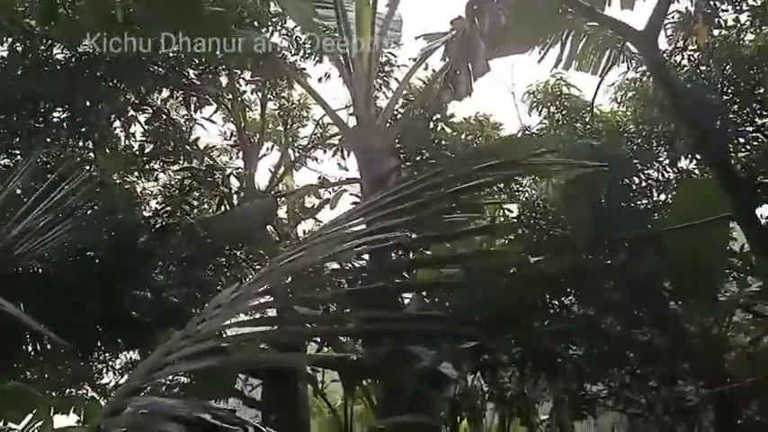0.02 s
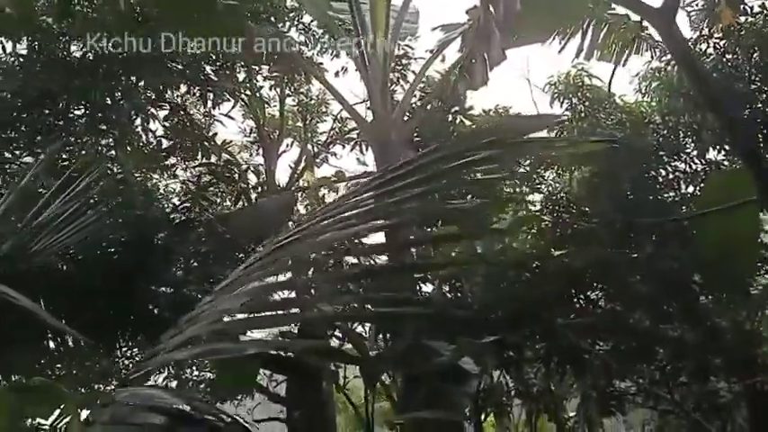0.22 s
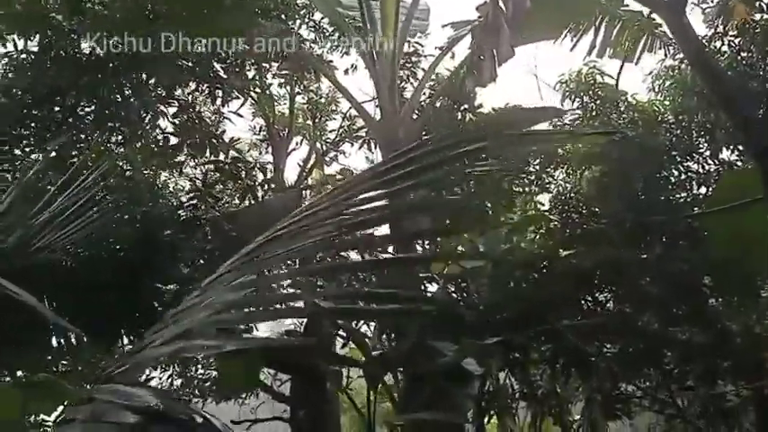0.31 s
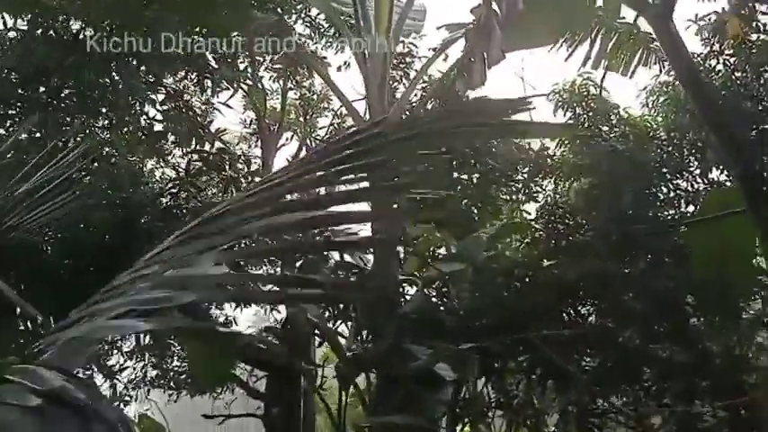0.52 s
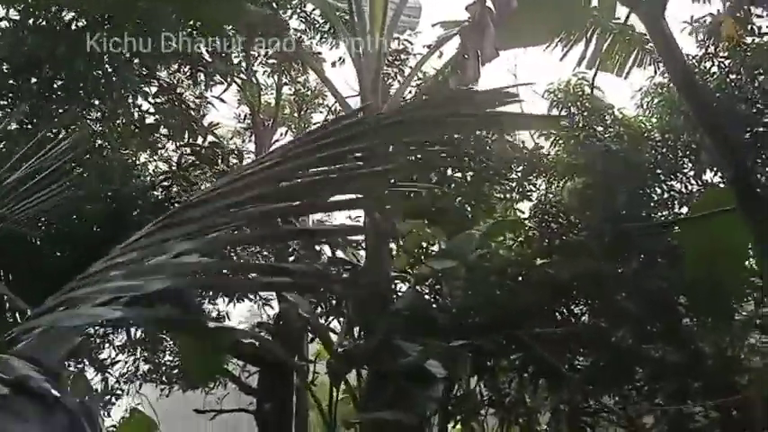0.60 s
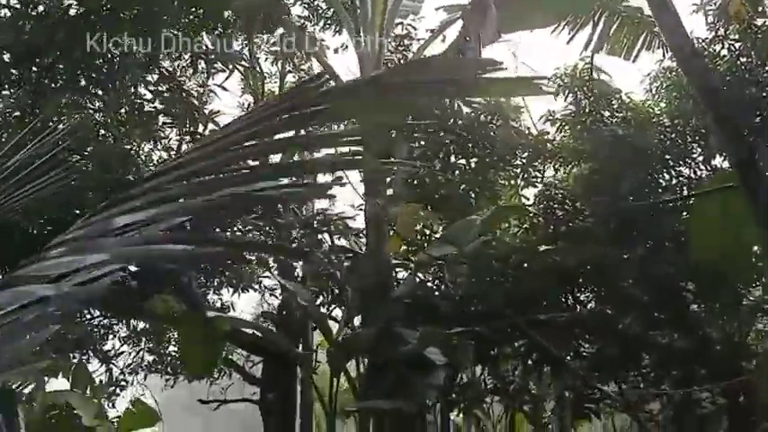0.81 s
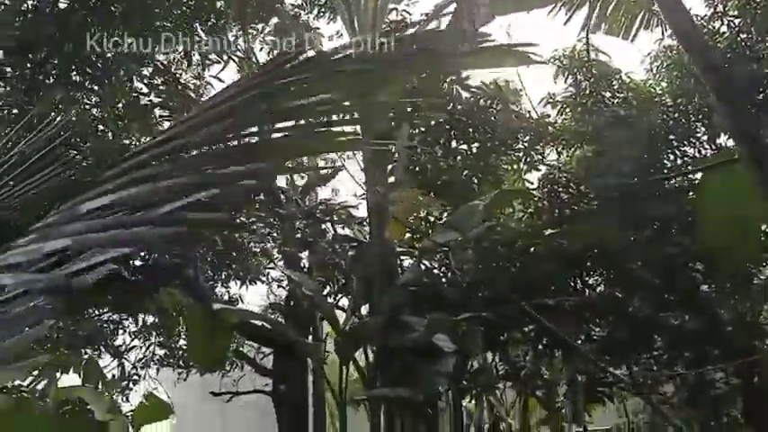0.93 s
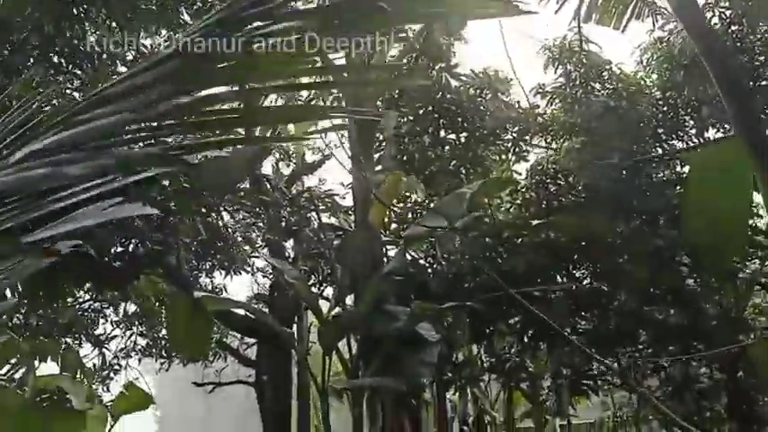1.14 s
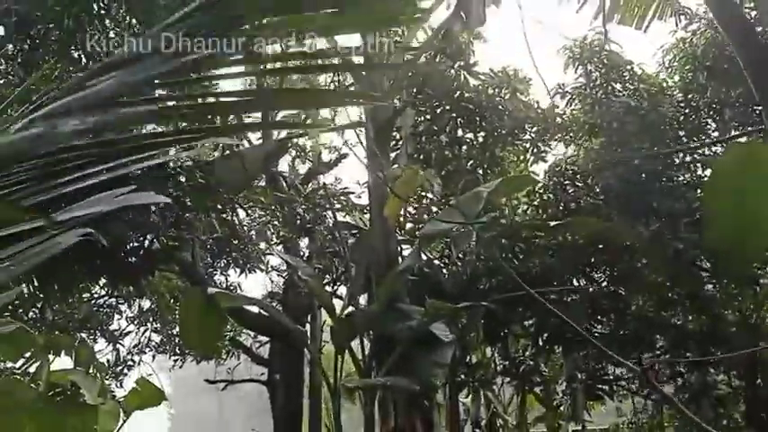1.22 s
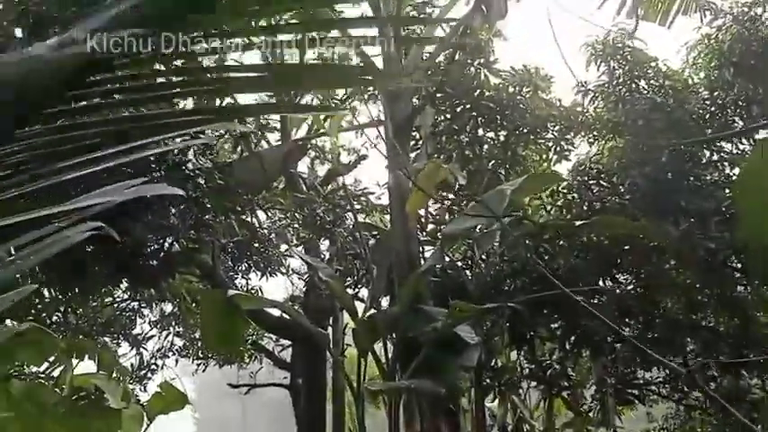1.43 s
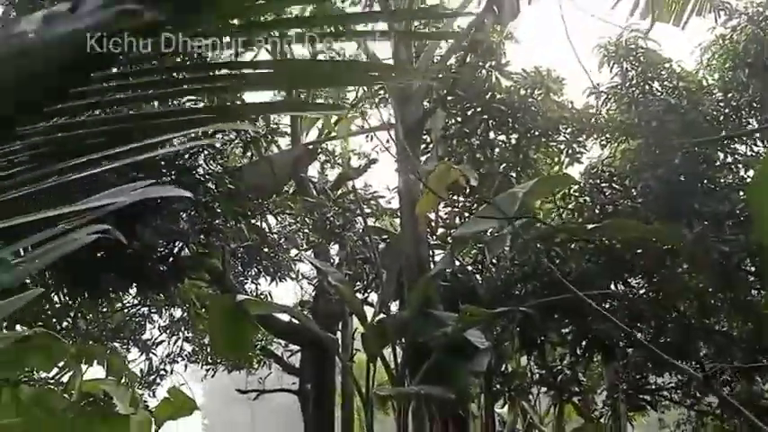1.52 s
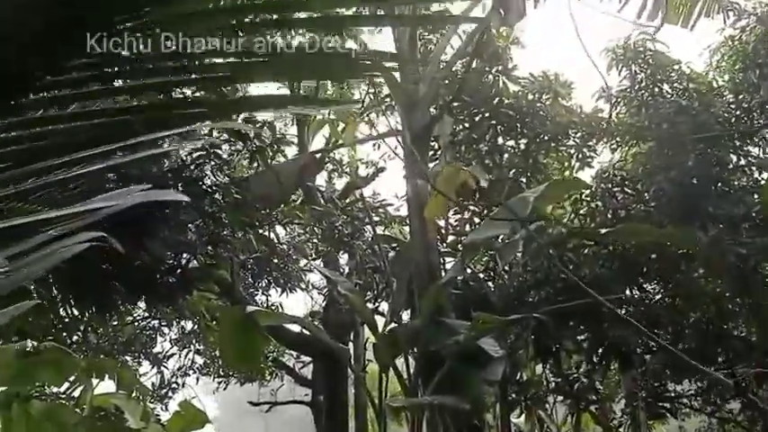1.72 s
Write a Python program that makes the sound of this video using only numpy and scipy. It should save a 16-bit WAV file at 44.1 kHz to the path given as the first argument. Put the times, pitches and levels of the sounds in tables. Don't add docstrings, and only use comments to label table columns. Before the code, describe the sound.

Birds call in garden trees. A near bird whistles bright, short rising notes at about 0.2, 0.75, 1.25 and 1.8 seconds, some with a soft swell before. Lower husky chirps and thin high whistles answer. A hoarse caw runs from 0.8 to 1.2, then leaves rustle until 1.6 and reedy notes fall. Drops tick; faint coos, distant chatter and low town hum lie beneath, with fluttering leafy echoes.

```python
import sys
import numpy as np
from scipy import signal
from scipy.io import wavfile
from scipy.ndimage import uniform_filter1d

SR = 44100
rng = np.random.default_rng(int(sys.argv[2]) if len(sys.argv) > 2 else 0)


def log_audio(samples):
    frames = np.atleast_2d(samples).T
    limited = np.clip(frames, -1, 1)
    pcm = np.round(limited * 32767).astype(np.int16)
    wavfile.write(sys.argv[1], SR, pcm)


def ratio_of_db(decibels):
    return 10 ** (np.asarray(decibels, float) / 20)


N = 79380

ATTACK_S, RELEASE_S = 0.0077, 0.032
SOFT_ATTACK_S = 0.014


def rms_one(x):
    return x / np.sqrt(np.mean(x ** 2) + 1e-20)


def at_hz(points, hz):
    table_hz, value = np.array(points).T
    return np.interp(np.log(hz), np.log(table_hz), value)


def drift(rate):
    r = np.exp(-80 * np.pi * rate / SR)
    white = rng.standard_normal(N // 40 + 2002)
    slow = signal.lfilter([1], [1, -2 * r, r * r], white)[2000:]
    return np.interp(np.arange(N) / 40, np.arange(len(slow)), rms_one(slow))


def resonance(x, hz, width_hz):
    r = np.exp(-np.pi * width_hz / SR)
    zeros = np.array([1, 0, -1]) * (1 - r * r) / 2
    return signal.lfilter(zeros, [1, -2 * r * np.cos(2 * np.pi * hz / SR), r * r], x)


def sides(pan_db):
    return ratio_of_db(np.array([[.5], [-.5]]) * pan_db)


def foliage(x, direct_db, leaves_db, lag=0):
    t60_s, build_s = 0.35, 0.0026
    t = np.arange(SR // 2) / SR
    swarm = rng.standard_normal((2, len(t))) * ratio_of_db(-60 * t / t60_s) * (1 - np.exp(-t / build_s))
    swarm *= ratio_of_db(leaves_db) / np.sqrt(np.sum(swarm ** 2, axis=1, keepdims=True))
    swarm[[0, 1], [0, lag]] += ratio_of_db(direct_db)
    return signal.fftconvolve(x * np.ones((2, 1)), swarm, axes=1)[:, :N]


def near_bird():
    # t/s, effort level/dB, beak opening as second over first partial/dB
    near_notes = [
        [(0.212, -42, -19.5), (0.254, -34, 5.5), (0.274, -36, -9.5), (0.29, -42, 22), (0.314, -36.5, -38),
         (0.338, -67, 11), (0.352, -64, 16), (0.368, -60, 19), (0.4, -73, 12.5)],
        [(0.728, -59, -2), (0.742, -41, -6), (0.77, -38, 9.5), (0.788, -43.5, -29), (0.81, -27, -13.5),
         (0.822, -42, 7.5), (0.858, -62.5, 13.5), (0.88, -52.5, 7)],
        [(1.25, -49, -12), (1.27, -31.5, -5.5), (1.308, -36.5, -1.5), (1.384, -60, 15.5), (1.41, -50.5, -12)],
        [(1.775, -39, -7), (1.783, -43.5, -25), (1.8, -46.5, -2)],
    ]
    upper_db = [-23, -27]
    partial_pan_db = [4, -8, 9, -1]
    from_hz, top_hz, rise_s, sag_hz_per_s = 3200, 3360, 0.01572, 231
    wobble = .003
    smooth_s = 0.01
    breath_db, breath_hz, breath_width_hz = -29, 5040, 9500
    t, out = np.arange(N) / SR, np.zeros((2, N))
    for note in near_notes:
        s, db, beak_db = np.transpose(note)
        age = np.maximum(t - s[0], 0)
        hz = top_hz - (top_hz - from_hz) * np.exp(-age / rise_s) - sag_hz_per_s * age
        phase = 2 * np.pi * np.cumsum(hz * (1 + wobble * drift(54.8))) / SR
        edge = np.clip(np.minimum(age / ATTACK_S, (s[-1] + RELEASE_S - t) / RELEASE_S), 0, 1)
        efforts = [np.interp(t, s, db), np.interp(t, s, db + beak_db)]
        first, second = uniform_filter1d(efforts, int(smooth_s * SR) + 1)
        middle = (first + second) / 2
        levels = [first, second] + [middle + up for up in upper_db]
        voice = 0
        for k, (level, pan) in enumerate(zip(levels, partial_pan_db)):
            voice = voice + sides(pan) * ratio_of_db(level) * np.sin((k + 1) * phase)
        breath = rms_one(resonance(rng.standard_normal(N), breath_hz, breath_width_hz))
        voice = voice + ratio_of_db(middle + breath_db) * breath
        out += foliage(np.sqrt(2) * edge * voice, direct_db=-1, leaves_db=-5, lag=18)
    return out


def flock(notes, upper_db, pan_db, rasp=.004, shut_db=0, attack_s=ATTACK_S):
    glide_share, rising = .4, 1.04
    t, out = np.arange(N) / SR, np.zeros((2, N))
    for s, length, first_hz, last_hz, db in notes:
        age = np.maximum(t - s, 0)
        hz = last_hz + (first_hz - last_hz) * np.exp(-age / (glide_share * length))
        phase = 2 * np.pi * np.cumsum(hz * (1 + rasp * drift(90))) / SR
        edge = np.clip(np.minimum(age / attack_s, (s + length - t) / RELEASE_S), 0, 1)
        beak_db = shut_db * (last_hz < rising * first_hz)
        voice = np.sin(phase)
        for k, up in enumerate(upper_db):
            voice = voice + ratio_of_db(up + beak_db) * np.sin((k + 2) * phase)
        out += foliage(np.sqrt(2) * ratio_of_db(db) * edge * voice, direct_db=-4, leaves_db=4)
    return out * sides(pan_db)


def run_up():
    # t/s, length/s, first f/Hz, last f/Hz, level/dB
    swells = [
        (.14, 0.12, 3064, 3225, -49),
        (1.18, 0.15, 3133, 3187, -52.5),
        (1.69, 0.128, 3170, 3286, -49),
    ]
    return flock(swells, upper_db=[-1.5, -25], pan_db=2.0, attack_s=0.11)


def kin():
    # t/s, length/s, first f/Hz, last f/Hz, level/dB
    kin_notes = [
        (1.425, 0.036, 3144, 3300, -47),
        (1.47, 0.031, 3240, 3190, -50.5),
        (1.54, 0.101, 3195, 3170, -76),
    ]
    return flock(kin_notes, upper_db=[0.0, -25], pan_db=-8.0, rasp=.009, attack_s=SOFT_ATTACK_S)


def low_companions():
    # t/s, length/s, first f/Hz, last f/Hz, level/dB
    low_notes = [(.205, 0.017, 2550, 2790, -42.5), (.33, 0.019, 2523, 2570, -47),
                 (.548, 0.049, 3120, 2950, -59.5), (.678, 0.052, 2920, 2900, -49),
                 (.725, 0.14, 2615, 2860, -53), (.9, 0.062, 3100, 3120, -84),
                 (.985, 0.031, 3090, 2970, -49), (1.03, 0.024, 2938, 2593, -39.5),
                 (1.07, 0.074, 2735, 2563, -51), (1.21, 0.02, 2627, 2596, -41.5),
                 (1.245, .12, 2610, 2971, -50.5), (1.45, 0.044, 3100, 2300, -53.5),
                 (1.5, 0.0499, 3100, 2616, -55.5), (1.55, 0.048, 2670, 2744, -54),
                 (1.595, 0.099, 2602, 2600, -53), (1.68, 0.02, 2700, 2740, -69),
                 (1.74, 0.17, 2600, 2850, -52.5), (.02, 0.07, 2960, 2900, -97)]
    return flock(low_notes, upper_db=[-8, -18], pan_db=-1.0, rasp=.018, shut_db=-19)


def high_companion():
    # t/s, length/s, first f/Hz, last f/Hz, level/dB
    high_notes = [
        (.89, 0.1, 3650, 3870, -44),
    ]
    return flock(high_notes, upper_db=[-26, -20], pan_db=1.0)


def reedy_notes():
    # t/s, length/s, first f/Hz, last f/Hz, level/dB
    falls = [
        (1.425, 0.12, 4511, 4462, -60),
        (1.455, 0.032, 4540, 3970, -52.5),
        (1.63, 0.033, 4460, 4460, -62),
        (1.655, 0.0497, 4490, 3728, -56.5),
        (1.76, 0.04, 4300, 3420, -55),
    ]
    return flock(falls, upper_db=[-12], pan_db=-1.5, rasp=.008, attack_s=SOFT_ATTACK_S)


def thin_notes():
    # t/s, length/s, first f/Hz, last f/Hz, level/dB
    pure_notes = [
        (.2, 0.068, 4700, 4985, -61.5),
        (.495, 0.1, 4970, 5072, -59),
        (.535, 0.044, 6927, 6960, -52),
        (.94, 0.074, 4400, 4830, -60.5),
    ]
    return flock(pure_notes, upper_db=[-24], pan_db=-6.5, attack_s=SOFT_ATTACK_S)


def caw():
    # t/s, effort level/dB, throat opening/0-1
    caw_course = [
        (.765, -63, 0),
        (0.783, -54, 0.4),
        (.86, -56.5, 0),
        (.92, -54.5, 0.83),
        (.96, -57.5, 1),
        (1.07, -59.5, 0.85),
        (1.16, -61.5, 1),
        (1.202, -75, 0.3),
    ]
    # f/Hz, width/Hz, level closed/dB, gain when open/dB
    throat = [(1080, 1600, -7, 7.5), (1605, 410, -6.5, 5.5), (2090, 780, 3.5, 2.2), (3100, 950, 5.5, -0.5),
              (3950, 1400, -28.5, 33), (6200, 1330, 5, -7), (8880, 2250, -13, 13.5), (11470, 420, -12, -5),
              (13900, 1900, -27, 12.5)]
    pulses_per_s, jitter, breath_share, uneven_db = 278, .05, .3, 2.5
    t = np.arange(N) / SR
    s, db, opening = np.transpose(caw_course)
    cycle = np.cumsum(pulses_per_s * (1 + jitter * drift(60.0))) / SR % 1
    pulses = rms_one((np.diff(cycle, prepend=0) < 0) * ratio_of_db(uneven_db * rng.standard_normal(N)))
    breath = rms_one(rng.standard_normal(N) * np.exp(-2 * cycle))
    source = (1 - breath_share) * pulses + breath_share * breath
    openness = np.interp(t, s, opening)
    voice = 0
    for k, (hz, width_hz, shut_db, open_db) in enumerate(throat):
        ringing = rms_one(resonance(resonance(source, hz, width_hz), hz, width_hz))
        voice = voice + (-1) ** k * ratio_of_db(shut_db + open_db * openness) * ringing
    effort = ratio_of_db(np.interp(t, s, db, left=-200, right=-200))
    return sides(-1.8) * foliage(effort * voice, direct_db=-7.0, leaves_db=-2)


def ticks():
    # t/s, peak level/dB, left minus right/dB, f/Hz
    drops = [(.055, -54, -4, 2100), (.140, -56, -5, 2200), (.238, -47, -6, 2400), (.4462, -49, -6, 2050),
             (.6744, -55, -5, 1400), (.697, -55, -5, 2000), (1.271, -54, -4, 2000), (1.291, -54, -4, 1700),
             (1.353, -58, -3, 1100), (1.4335, -50, -5, 1800), (1.5025, -44, -6, 2000),
             (1.612, -56, -5, 1950), (1.665, -58, -5, 1950)]
    width_hz = 900
    out, t = np.zeros((2, N)), np.arange(300) / SR
    for s, db, pan_db, hz in drops:
        ring = np.sin(2 * np.pi * hz * t) * t * np.exp(-np.pi * width_hz * t)
        i = int(s * SR)
        out[:, i:i + len(t)] += sides(pan_db) * ratio_of_db(db + 5) * ring / np.abs(ring).max()
    return out


def rustle():
    # t/s, level/dB
    hop_course = [
        (1.2, -92),
        (1.25, -61.5),
        (1.3, -63.5),
        (1.37, -66),
        (1.43, -63.5),
        (1.52, -64),
        (1.6, -74.5),
        (1.68, -82),
    ]
    # f/Hz, width/Hz, level/dB
    leaf_colour = [(1470, 1700, 0.5), (2150, 1400, 0.5), (7040, 2200, 3.5), (8600, 1300, -1)]
    grains_per_s = 2500
    s, db = np.transpose(hop_course)
    grains = (rng.random((2, N)) < grains_per_s / SR) * rng.standard_normal((2, N)) + 1e-18
    leaves = 0
    for hz, width_hz, level_db in leaf_colour:
        ringing = resonance(resonance(grains, hz, width_hz), hz, width_hz)
        leaves = leaves + ratio_of_db(level_db) * rms_one(ringing)
    return ratio_of_db(np.interp(np.arange(N) / SR, s, db, left=-200, right=-200)) * leaves


def coos():
    # t/s, length/s, first f/Hz, last f/Hz, level/dB
    coo_notes = [
        (.735, 0.041, 420, 407, -67),
        (.91, 0.022, 920, 805, -58.5),
        (1.02, 0.17, 1057, 1094, -70.5),
        (1.1, 0.069, 630, 626, -71),
        (1.34, 0.016, 1072, 1010, -56),
        (1.4, 0.042, 380, 381, -63),
    ]
    return flock(coo_notes, upper_db=[-12], pan_db=-4.5, rasp=.054)


def banded_noise(spectrum, lowest_hz, count, step, patchy_db, flicker):
    # f/Hz, left-right likeness/0-1
    likeness = [(60, 1), (250, 0.65), (500, 0.6), (1000, 0.028), (4000, 0.03)]
    out, borders = 0, lowest_hz * 2 ** (step * np.arange(count + 1))
    white = rng.standard_normal((2, 2, N + 4000))
    for k, (low, high) in enumerate(zip(borders, borders[1:])):
        sos = signal.butter(2, [low, min(high, .45 * SR)], "band", fs=SR, output="sos")
        mid, side = signal.sosfilt(sos, white[k % 2])[:, -N:]
        hz = np.sqrt(low * high)
        alike = np.clip(at_hz(likeness, hz), -1, 1)
        gain = ratio_of_db(at_hz(spectrum, hz) + patchy_db * drift(flicker))
        out = out + gain * (np.sqrt(1 + alike) * mid + np.sqrt(1 - alike) * side * [[1], [-1]])
    return rms_one(out)


def chatter():
    # f/Hz, level per Hz/dB
    chatter_colour = [(1300, -11.5), (2000, -1.5), (2800, 1), (3500, -2.5), (4500, -23), (5500, -34),
                      (6700, 2), (8000, -33)]
    return ratio_of_db(-59.5) * banded_noise(chatter_colour, 1300, count=26, step=1 / 10, patchy_db=3.5, flicker=8)


def town_hum():
    # f/Hz, level per Hz/dB
    air_colour = [(30, -61), (65, -3.5), (123, -4.5), (300, -12), (800, -15), (3000, -28), (8000, -21.5),
                  (15000, -31)]
    return ratio_of_db(-62.5) * banded_noise(air_colour, 39.64, count=17, step=.5, patchy_db=1.7, flicker=11.0)


def scene():
    birds = near_bird() + run_up() + kin() + low_companions() + high_companion()
    birds = birds + reedy_notes() + thin_notes() + caw() + coos()
    return birds + ticks() + rustle() + chatter() + town_hum()


def masking(x):
    # f/Hz, level per bin/dB
    faint_floor = [(3600, -105), (4800, -97), (5500, -102), (8500, -108), (10600, -93), (11500, -102),
                   (12700, -96), (15000, -103)]
    mask_db, up_db_per_oct, down_db_per_oct, from_hz = -13, 78, 170, 3500
    wander_db = 10
    hz, _, spec = signal.stft(x, SR, "hann", 2048, 1536)
    band = np.floor(14 * np.log2(np.maximum(hz, 1000) / 1000)).astype(int)
    member = (band == np.arange(band.max() + 1)[:, None]) * 1.0
    power = member @ np.mean(np.abs(spec) ** 2, axis=0)
    centre = 1000 * 2 ** ((np.arange(len(member)) + .5) / 14)
    octaves = np.log2(centre[:, None] / centre)
    slope = np.where(octaves > 0, up_db_per_oct, -down_db_per_oct)
    limit = ratio_of_db(mask_db - slope * octaves) ** 2 @ power
    faint = (ratio_of_db(2 * at_hz(faint_floor, centre)) * member.sum(axis=1))[:, None]
    wander = ratio_of_db(2 * wander_db * uniform_filter1d(rng.standard_normal(power.shape), size=8, axis=1))
    keep = (power > limit * np.sqrt(wander)) & (power > faint * wander)
    keep = keep | (centre[:, None] < from_hz)
    return signal.istft(spec * keep[band], SR, "hann", 2048, 1536)[1][:, :N]


def roll_off(x):
    return signal.sosfilt(signal.butter(12, 15640, fs=SR, output="sos"), x)


def record(dry):
    mix = masking(dry)
    return roll_off(mix)


dry = scene()
out = record(dry)
log_audio(out)
```